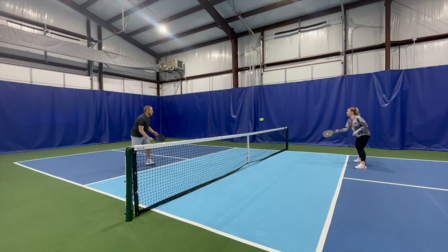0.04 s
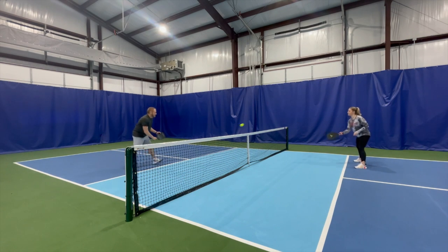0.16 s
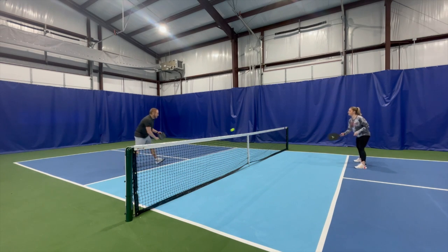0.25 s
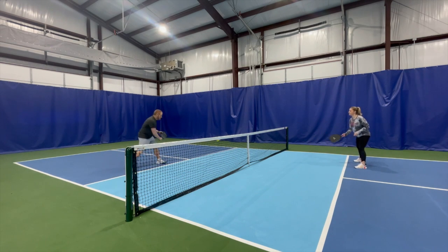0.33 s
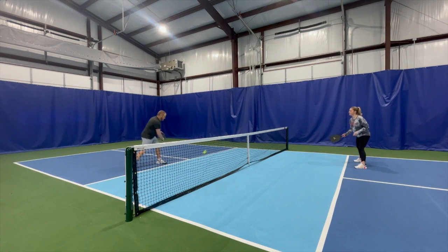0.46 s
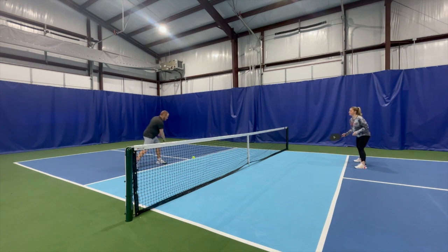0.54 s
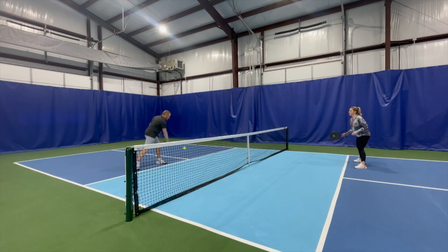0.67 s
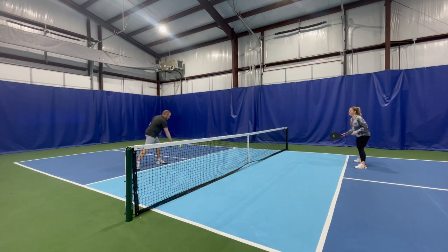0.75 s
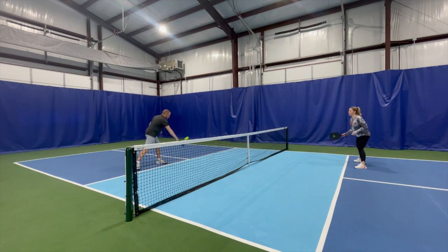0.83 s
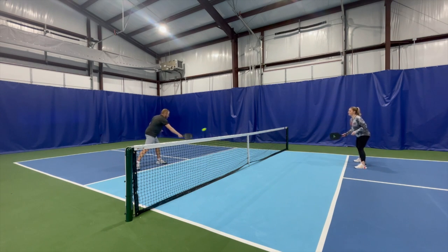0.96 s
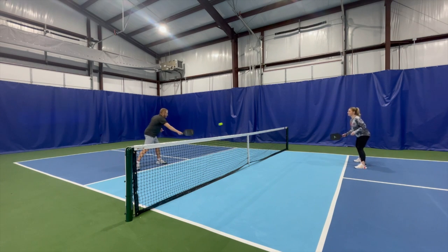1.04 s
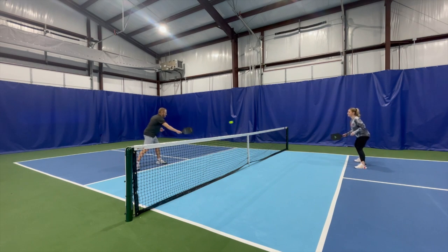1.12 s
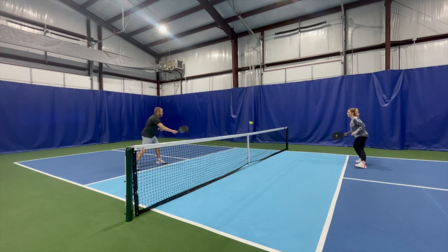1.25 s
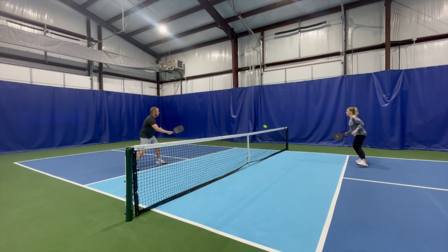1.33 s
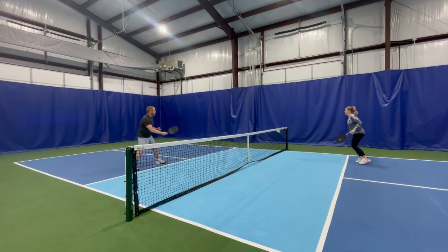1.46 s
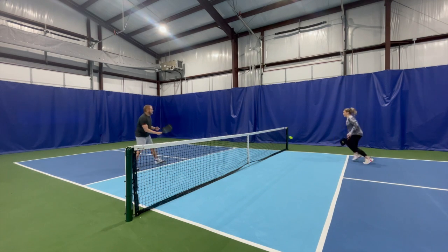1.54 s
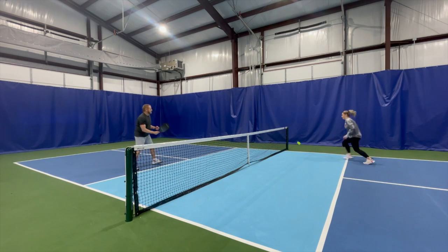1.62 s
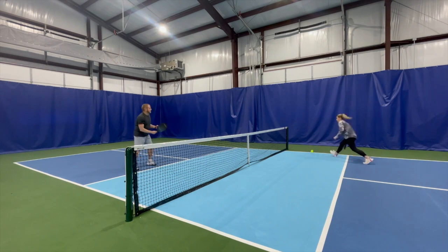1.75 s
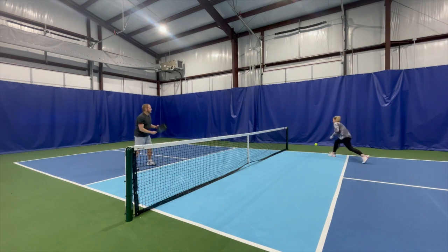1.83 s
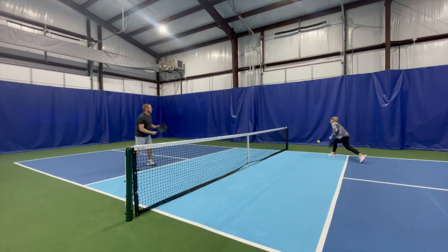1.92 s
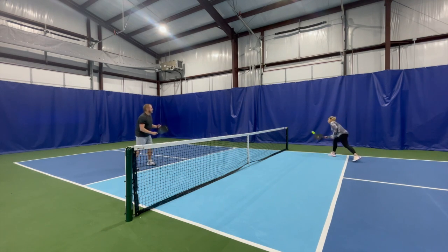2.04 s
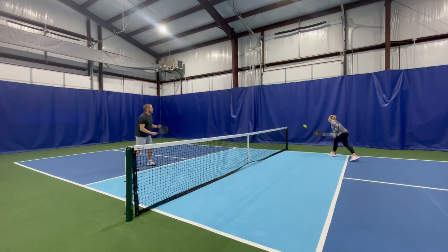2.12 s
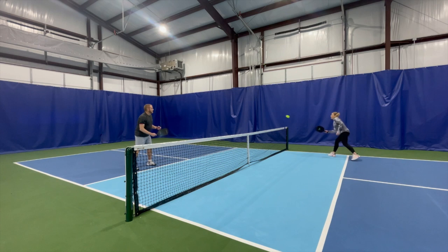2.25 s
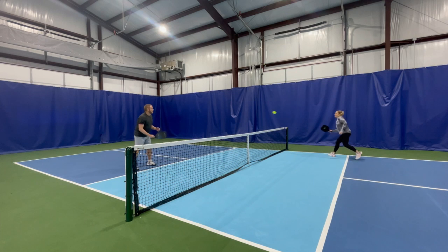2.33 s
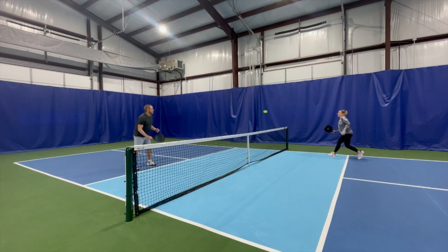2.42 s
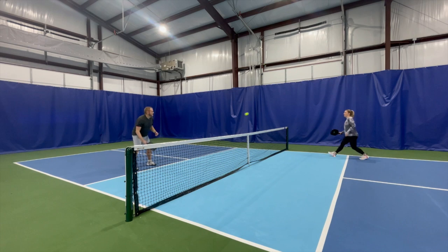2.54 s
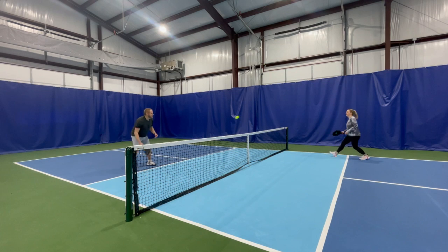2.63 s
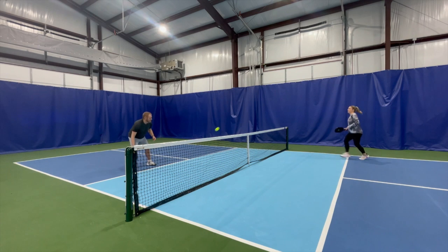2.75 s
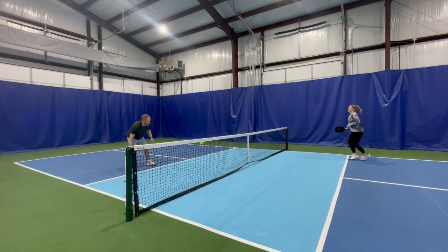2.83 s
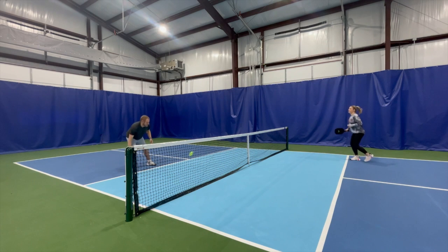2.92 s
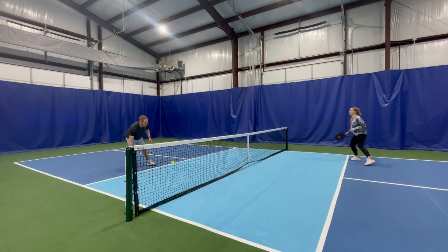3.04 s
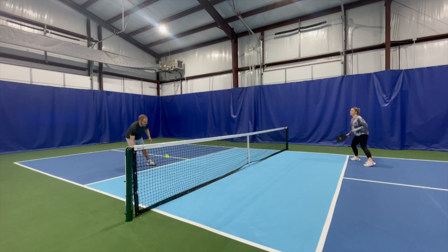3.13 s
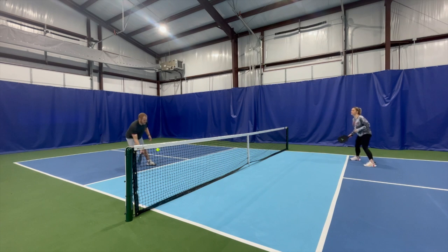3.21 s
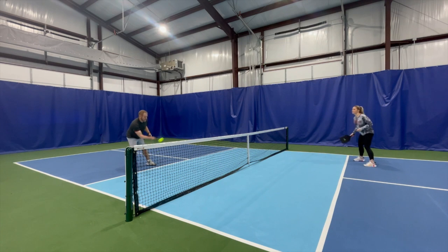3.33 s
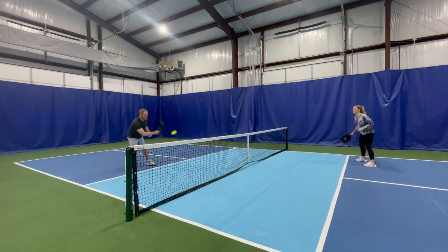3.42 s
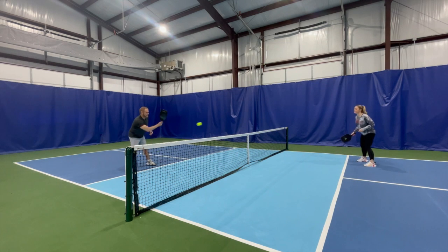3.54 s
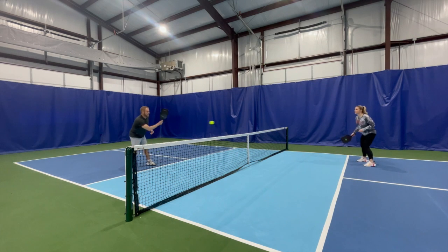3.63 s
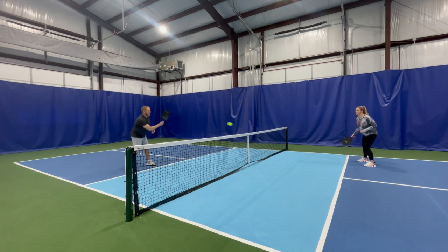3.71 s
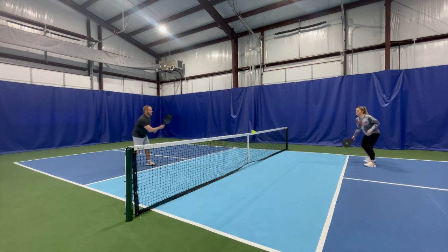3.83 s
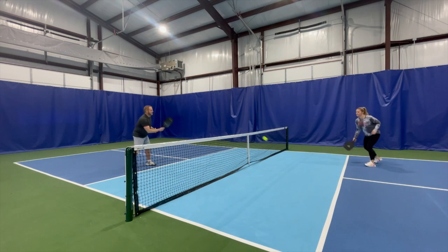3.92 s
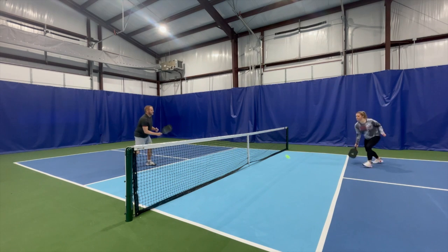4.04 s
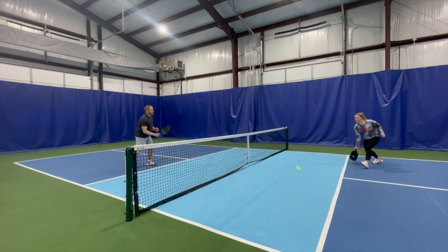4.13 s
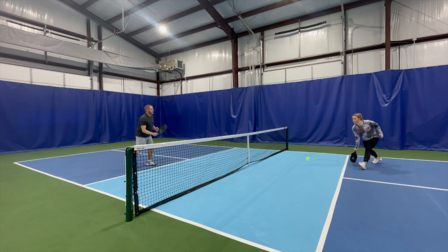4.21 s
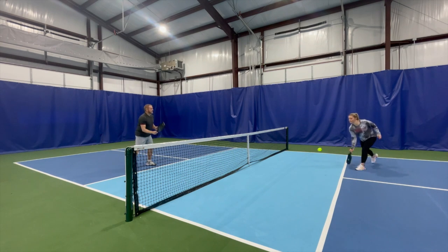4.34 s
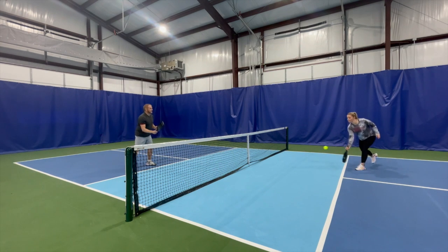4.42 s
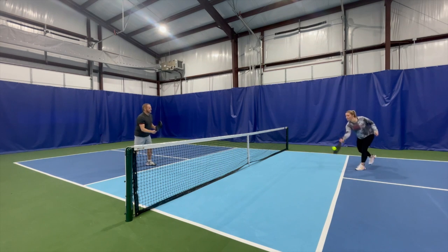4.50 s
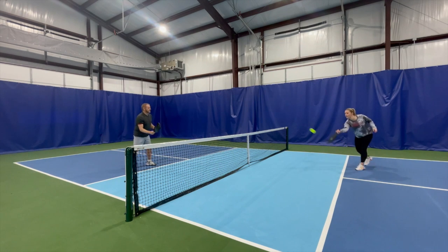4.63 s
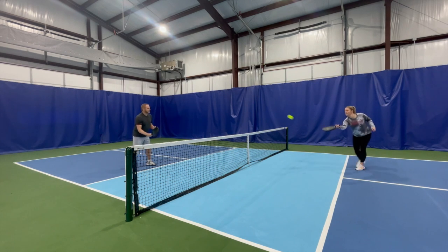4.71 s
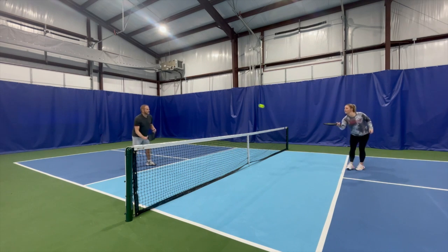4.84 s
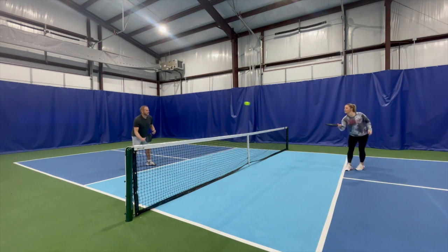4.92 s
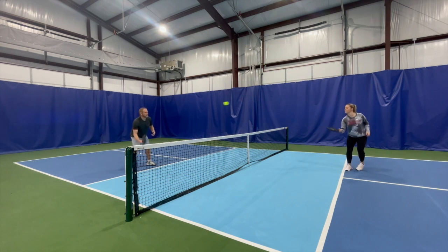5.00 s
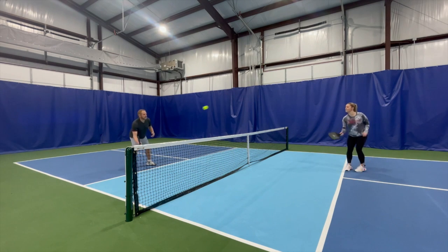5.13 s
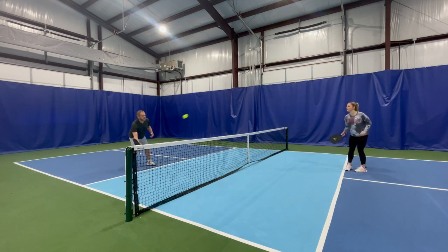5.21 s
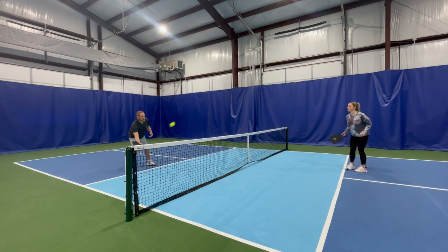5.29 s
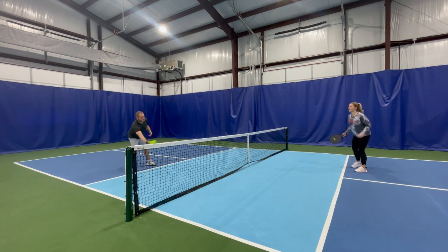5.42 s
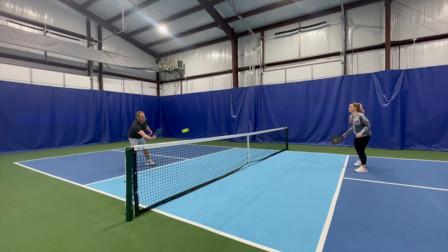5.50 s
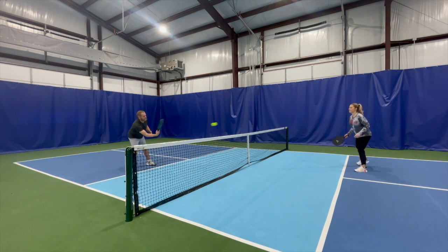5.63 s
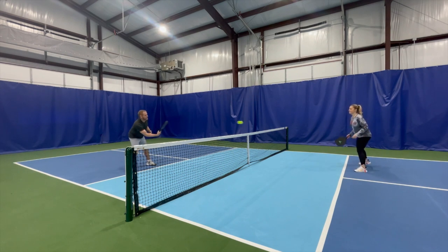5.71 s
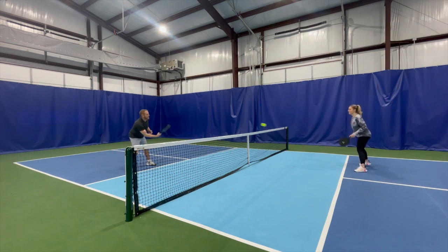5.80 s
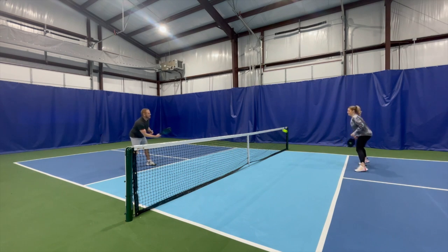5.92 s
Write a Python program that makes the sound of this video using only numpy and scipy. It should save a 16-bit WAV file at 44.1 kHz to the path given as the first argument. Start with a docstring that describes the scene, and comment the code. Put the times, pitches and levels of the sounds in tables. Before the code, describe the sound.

Two players tap a hollow plastic ball back and forth with hard paddles in a large echoing indoor court, shoes thudding and scuffing between hits.

```python
"""Paddle blows on a hollow plastic ball: two players dink over a net in a steel-roofed sports hall, a phone
at the net post. Blows and floor bounces are decaying rings under a burst of contact noise; shoes thud, slap
and scuff. Each sound comes straight to the phone and through the hall: roof and wall echoes, then noise
that dies over about a second. A faint, mostly bass rumble of hall air lies under it all."""
import sys
import numpy as np
from scipy import signal
from scipy.fft import rfft, irfft
from scipy.io import wavfile
from scipy.ndimage import uniform_filter1d

SR = 44100
rng = np.random.default_rng(int(sys.argv[2]) if len(sys.argv) > 2 else 0)


def pcm_store(signal):
    """Save signal as 16-bit PCM."""
    levels = np.round(np.clip(np.atleast_2d(signal), -1, 1) * 32767)
    wavfile.write(sys.argv[1], SR, levels.astype(np.int16).T)


N = 262836

LEFT, RIGHT = -0.59, 0.69  # where the two players stand, -1 left .. 1 right
PORT_LAG_S = 13 / 44100  # how late the treble reaches the right port
STEP_ECHO_MS, STEP_ECHO_DB = 15, 18  # wall echo of every footfall
SCUFF_HALL_DB = -17.5  # in the hall, relative to the straight level
# Ball meeting the floor: (time [s], level in the hall [dB], shell rings over the crack [dB],
#  gain straight to the phone of middle ring [dB], upper ring [dB] and crack [dB],
#  wall echo delay [ms], wall echo level [dB], side [-1 left .. 1 right])
BOUNCES = [(0.519, -42.5, -2, 13, 14.5, 22.5, 30, 2, -0.62), (1.7316, -43, -5.5, -3, -5, 26, 16, 15, -0.19),
           (2.9996, -39.5, -6.5, 12, 21.5, 27, 34.5, 25, -0.18),
           (4.128, -46.5, 0.5, 22, 15, 27, 28.5, 16.5, 0.46)]
# Colour of hard contact noise: (frequency [Hz], level [dB])
CONTACT_COLOUR = [(300, -71.5), (1500, -32), (2500, -2), (4000, -5.5), (6000, -2.5), (7500, -4.5),
                  (9000, -2), (11000, 2), (12300, -5.5), (13500, -55.5), (15000, -25.5), (16300, -46)]


def undb(db):
    """Amplitude ratio from decibels."""
    return 10 ** (np.asarray(db) / 20)


def along(table, hz, axis=1):
    """Read a column of a spectrum table on a log-frequency axis."""
    table = np.array(table)
    return np.interp(np.log(hz + 1), np.log(table[:, 0]), table[:, axis])


def fade(t, t60):
    """Exponential decay that loses 60 dB in t60 seconds."""
    return np.exp(-np.log(1000) * t / t60)


def ring(modes, contact_ms, size=4096):
    """Decaying modes that build up while the contact lasts and radiate little outside their range; peak 1."""
    t = np.arange(size) / SR
    y = sum(undb(db) * np.sin(2 * np.pi * hz * t) * fade(t, ms / 1000) for hz, ms, db in modes)
    y = y * (1 - np.exp(-t / contact_ms * 1000)) ** 2
    band = [0.5 * modes[0][0], 1.39 * modes[-1][0]]
    y = signal.sosfilt(signal.butter(2, band, "band", fs=SR, output="sos"), y)
    return y / abs(y).max()


def burst(shape, size=4096):
    """Noise under a short envelope with the colour of hard contact; peak 1."""
    noise = rng.standard_normal(size) * shape(np.arange(size) / SR)
    colour = undb(along(CONTACT_COLOUR, np.fft.rfftfreq(size, 1 / SR)))
    y = irfft(rfft(noise) * colour)
    y[size // 2:] = 0  # silence the second half of the buffer
    return y / abs(y).max()


def pair(one, other):
    """Spectra for left and right from two unrelated ones, partly alike and partly late and inverted."""
    # Both ports in a diffuse field: (frequency [Hz], share alike [below 0 upside down],
    #  share late and upside down on the right [ratio], left minus right [dB])
    port_likeness = [(65, 1, 0.051, -1), (154, 0.74, 0, -1), (333, 0.57, 0.066, -1), (530, -0.49, 0, -3.5),
                     (870, -0.43, 0.035, -1.5), (1490, -0.016, 0.064, -3.5), (3040, -0.13, 0.23, -2.5),
                     (4350, 0.12, 0.0025, -5.5), (7170, 0.13, 0, -7.5), (8500, 0.16, 0.75, 0.5),
                     (13100, -0.33, 1, 0)]
    hz = np.linspace(0, SR / 2, len(one))
    alike, late = (np.clip(along(port_likeness, hz, axis=k), -.99, .99) for k in (1, 2))
    tie = alike - late * np.exp(-2j * np.pi * hz * PORT_LAG_S)
    right = tie * one + np.sqrt(np.clip(1 - abs(tie) ** 2, 0, 1)) * other
    tilt = undb(along(port_likeness, hz, axis=3) / 2)
    return np.array([one * tilt, right / tilt])


def ports(hz, side):
    """One wave at the two ports: the nearer hears it sooner and louder; the treble has a fixed lag and sign."""
    side_lag_ms, side_db, split_hz = 0.56, 11.5, 6000  # lag and level between ports, per unit of side
    louder = undb(side_db * side / 2 * hz / (hz + 250))
    sooner = np.exp(1j * np.pi * hz * side * side_lag_ms / 1000)
    lean = louder * sooner
    low = 1 / (1 + (hz / split_hz) ** 6)
    treble = np.array([np.ones(len(hz)), -np.exp(-2j * np.pi * hz * PORT_LAG_S)])
    return low * np.array([1 / lean, lean]) + (1 - low) * treble


def hall(echo_ms, echo_db, side, size):
    """Spectrum of the hall's answer: noise that thickens until the wall answers, then dies band by band."""
    # Reverberation of the hall: (frequency [Hz], decay by 60 dB [s])
    band_decay = [(60, 0.78), (125, 1.01), (250, 0.88), (500, 0.77), (1000, 0.68), (2000, 0.98),
                  (4000, 1.34), (7000, 1.206), (11000, 0.71)]
    early_db, patchy_db, top_hz = -14, 5, 12500
    roof_ms, roof_db = 12.3, 15  # early echo, alike for every spot on the court
    curtain_hz = 9000  # wall curtains dull the echoes above this
    t, hz = np.arange(size) / SR, np.fft.rfftfreq(size, 1 / SR)
    white = pair(*rfft(rng.standard_normal((2, size)))) / np.sqrt(1 + (hz / top_hz) ** 60)

    # overlapping triangular bands, each with its own decay
    centres = np.log(np.array(band_decay)[:, 0])
    place = np.interp(np.log(hz + 1), centres, np.arange(len(band_decay)))
    tail = 0
    for k, (_, t60) in enumerate(band_decay):
        tail = tail + irfft(white * np.clip(1 - abs(place - k), 0, 1)) * fade(t, t60)
    before_wall = np.clip(1 - t / echo_ms * 1000, 0, 1)
    tail = tail * np.clip(t / 0.002, 0, 1) * undb(early_db * before_wall)

    # the first tenth of a second still comes in separate clumps
    clumps = uniform_filter1d(np.repeat(rng.standard_normal(size // 128), 128), size=96)
    tail = tail * undb(patchy_db * clumps * np.exp(-t / 0.086))

    # two mirror echoes: the roof and the wall behind the player
    hz = np.fft.rfftfreq(2 * size, 1 / SR)
    mirrors = ((roof_ms, roof_db), (echo_ms, echo_db))
    echoes = sum(undb(db) * np.exp(-2j * np.pi * hz * ms / 1000) for ms, db in mirrors)
    return rfft(tail, 2 * size) + echoes * ports(hz, side) / np.sqrt(1 + (hz / curtain_hz) ** 2)


def add(out, s, parts, near_db, far_db, side, response):
    """Place one event: its parts straight to the two ports, and in another blend through the hall."""
    straight_bright_hz = 5900  # contact noise beams its treble; below this it reaches the phone weaker
    size = 2 * (response.shape[1] - 1)
    spectra = rfft(parts, size)
    hz = np.fft.rfftfreq(size, 1 / SR)
    contact_size = np.linalg.norm(spectra[-1])
    spectra[-1] *= hz / np.hypot(hz, straight_bright_hz)
    near = undb(near_db) @ spectra * ports(hz, side)

    # in the hall the contact is a short click with the smooth contact colour
    even = undb(along(CONTACT_COLOUR, hz)) * np.exp(-2j * np.pi * hz * .0015)
    spectra[-1] = even * contact_size / np.linalg.norm(even)
    far = undb(far_db) / np.sqrt(np.sum(parts ** 2, axis=1)) @ spectra

    sound = irfft(near + far * response)[:, :size - 4096]
    at = int(round(s * SR))
    lo, hi = max(at, 0), min(at + sound.shape[1], N)
    out[:, lo:hi] += sound[:, lo - at:hi - at]
    return out


def rumble():
    """The steady air of the hall: shaped noise, mostly bass, its level wavering a little."""
    # Tone of the hall air: (frequency [Hz], relative level per Hz [dB])
    air_colour = [(25, 2), (65, -3), (150, -17.5), (300, -27), (700, -20), (2000, -18), (6000, -27.5),
                  (10000, -36.5), (13000, -76)]
    level_db, sway_db = -61, 1
    hz = np.fft.rfftfreq(N, 1 / SR)
    noise = pair(*rfft(rng.standard_normal((2, N))))
    air = irfft(noise * undb(along(air_colour, hz)), N)
    k = int(SR / 6)
    sway = uniform_filter1d(np.repeat(rng.standard_normal(N // k + 1), k), k)[:N]
    return air / air.std() * undb(level_db + sway_db * sway)


def scuff(slide_ms):
    """A sole dragged over the court: noise that grips, slides, lets go."""
    def drag(t):
        return (1 - np.exp(-t / 0.0046)) * fade(np.clip(t - slide_ms / 1000, 0, 1), 0.026)
    return burst(drag)


def scuffs():
    """Soles that slide as a player sets off or stops: scuff noise straight and through the hall."""
    # Slides of the soles: (time [s], straight level [dB], length of the slide [ms], player [side])
    slides = [(1.303, -42.5, 5.1, RIGHT), (1.399, -53, 4.7, RIGHT), (1.814, -39, 3, RIGHT),
              (2.81, -51.5, 6, LEFT), (2.854, -74, 4, LEFT), (3.913, -37.5, 5.1, RIGHT),
              (4.075, -35, 22, RIGHT), (4.291, -61, 5, RIGHT), (4.89, -60, 5, RIGHT),
              (5.116, -45, 12, LEFT)]
    out = np.zeros((2, N))
    for s, db, slide_ms, side in slides:
        response = hall(STEP_ECHO_MS, STEP_ECHO_DB, side, size=32768)
        add(out, s, scuff(slide_ms)[None], [db], [db + SCUFF_HALL_DB], side, response)
    return out


def shoes():
    """A heel thuds into the floor and the sole slaps, two short rings with a faint gritty edge."""
    # Footfalls: (time [s], straight thud level [dB], straight slap level [dB],
    #  lower slap mode [Hz], player [side])
    footfalls = [(0.152, -53.5, -78, 550, RIGHT), (0.251, -46.5, -64, 1140, RIGHT),
                 (0.362, -55.5, -58, 527, RIGHT), (1.208, -31, -29, 640, RIGHT),
                 (1.399, -58.5, -47.5, 620, RIGHT), (1.525, -57.5, -42, 580, LEFT),
                 (1.544, -48, -47, 553, LEFT), (1.814, -37, -30, 830, RIGHT),
                 (1.83, -45, -34.5, 1480, RIGHT), (2.439, -50.5, -45, 564, RIGHT),
                 (2.619, -47.5, -46.5, 540, RIGHT), (2.852, -43, -39.5, 760, LEFT),
                 (3.697, -44.5, -38.5, 490, RIGHT), (3.91, -49, -40.5, 500, RIGHT),
                 (3.943, -47.5, -42.5, 480, RIGHT), (4.291, -49, -43.5, 516, RIGHT),
                 (4.89, -56.5, -42.5, 553, RIGHT), (4.921, -52, -57, 536, RIGHT),
                 (5.116, -65.5, -56, 574, LEFT)]
    thud_hall_db, slap_hall_db = -7.5, -16  # relative to the straight level
    out = np.zeros((2, N))
    thud = ring([(60, 112, 7.0), (166.8, 14.9, 18.4)], 0.28)
    for s, thud_db, slap_db, slap_hz, side in footfalls:
        slap = ring([(slap_hz, 8, 0), (1.62 * slap_hz, 6, -3)], 0.11)
        parts = np.array([thud, slap, scuff(0)])
        near = np.array([thud_db, slap_db, slap_db - 19.5])
        far = near + [thud_hall_db, slap_hall_db, SCUFF_HALL_DB]
        add(out, s, parts, near, far, side, hall(STEP_ECHO_MS, STEP_ECHO_DB, side, size=32768))
    return out


def slab():
    """Each bounce also runs through the floor slab and arrives a little ahead, dull and faint."""
    lead_s, level_db = 0.008, -41
    out, knock = np.zeros(N), ring([(306, 13, 6), (510, 10.0, 5.5)], 0.71)
    for s, *_ in BOUNCES:
        at = int((s - lead_s) * SR)
        out[at:at + len(knock)] += knock * undb(level_db)
    return out


def blow(s, rings, near_db, far_db, echo_ms, echo_db, side, rattle_db, rattle_t60):
    """Ball against paddle or floor: the body rings, the contact cracks and the shell rattles on briefly."""
    def contact(t):
        crack = t / .0003 * np.exp(1 - t / .0003)
        rattle = undb(rattle_db) * np.clip(t / 0.0026, 0, 1) * fade(t, rattle_t60)
        return crack + rattle
    parts = np.array(rings + [burst(contact)])
    response = hall(echo_ms, echo_db, side, size=65536)
    return add(np.zeros((2, N)), s, parts, near_db, far_db, side, response)


def bounces():
    """The ball on the floor: one blend of shell rings, stronger or weaker against the crack."""
    # Modes of the shell, grouped as thump, low, middle and upper ring:
    #  (frequency [Hz], decay by 60 dB [ms], level within the ring [dB])
    shell_modes = [
        [(111, 7.7, 0.017), (204, 15, 0)],
        [(423, 4.3, 0)],
        [(1038, 5.5, -4), (1372, 4.2, -6)],
        [(2400, 4.06, 9), (2850, 6.1, -18.5)],
    ]
    hall_blend_db = np.array((-1.1, 0.35, -0.2, -0.088))  # thump, low, middle, upper ring
    under_middle_db = np.array((-28, -16))  # straight gain of thump and low ring, relative to the middle
    out, rings = 0, [ring(modes, 0.16) for modes in shell_modes]
    for s, db, ring_db, middle_db, upper_db, crack_db, echo_ms, echo_db, side in BOUNCES:
        far = db + np.append(ring_db + hall_blend_db, 0)
        near = far + [*(middle_db + under_middle_db), middle_db, upper_db, crack_db]
        out = out + blow(s, rings, near, far, echo_ms, echo_db, side, rattle_db=-7.5, rattle_t60=0.022)
    return out


def paddles():
    """An off-centre blow trades middle ring for low; a face turned to the phone sends more straight to it."""
    # Blows: (time [s], level in the hall [dB], off centre: low ring up and middle ring down [dB],
    #  upper ring [dB], face to the phone: low ring gain [dB] and crack gain [dB] over the hall level,
    #  wall echo delay [ms], wall echo level [dB], side [-1 left .. 1 right],
    #  pitch of the rings [ratio], length of the rings [ratio])
    hits = [(-0.33, -37.5, 2, -8.5, 0, 0, 33, 22, -.8, 0.94, 0.8),
            (0.8049, -31.5, -0.5, -10, 1.5, 16.5, 31.15, 23.5, -0.33, 1.053, 1.12),
            (1.9995, -31, -1.5, -3.5, 14.5, 24.5, 25.7, 24, 0.72, 1.017, 0.72),
            (3.3007, -34.5, 5.5, -8.5, 3, 21, 35.46, 24.2, -0.63, 1.075, 0.59),
            (4.5231, -30, -2, -12, 4, 24, 30.15, 22.5, 0.48, 1.02, 1.12),
            (5.4104, -29, 2.5, -5.5, -1, 16, 37.7, 22, -0.64, 0.99, 0.71)]
    # Modes of the paddle at ratio 1, grouped as thump, low, middle and upper ring:
    #  (frequency [Hz], decay by 60 dB [ms], level within the ring [dB])
    paddle_modes = [
        [(128, 83, -24.5), (176.3, 25.6, 1)],
        [(347, 41, -10.5), (448, 15.7, 9.5), (533, 14.5, 1.5), (750, 30, -17)],
        [(1115, 9, -7), (1210, 18.2, 2.5), (1545, 56, -17)],
        [(1957, 12.7, 22), (2260, 8.7, 18.5), (2670, 2.2, -8), (3044, 14, -15)],
    ]
    thump_hall_db, low_hall_db, middle_hall_db = -9, 2.5, 1.5  # over the crack, for a centred blow
    thump_db, middle_db, top_db = 0, 7, 8  # straight gain: thump over the low ring's; middle and upper ring
    out = 0
    for s, db, off_db, upper_db, low_db, crack_db, echo_ms, echo_db, side, pitch, length in hits:
        rings = []
        for modes in paddle_modes:
            tuned = [(hz * pitch, ms * length, g) for hz, ms, g in modes]
            rings.append(ring(tuned, 0.67))
        far = db + np.array([thump_hall_db, low_hall_db + off_db, middle_hall_db - off_db, upper_db, 0])
        near = far + [low_db + thump_db, low_db, middle_db, top_db, crack_db]
        out = out + blow(s, rings, near, far, echo_ms, echo_db, side, rattle_db=-1.5, rattle_t60=0.019)
    return out


def scene():
    """The hall air, the players' feet, and the ball on floor and paddle."""
    return rumble() + scuffs() + shoes() + slab() + bounces() + paddles()


def record(dry):
    """The phone thins and delays the bass, turns quiet sound above it further down and cuts the top."""
    low_cut_hz, top_hz, bass_hz = 68.2, 16200, 250
    quiet_db, slope = -60, 1.0  # below this level, extra dB lost per dB
    late_cycles = 0.61
    x = signal.sosfilt(signal.butter(2, low_cut_hz, "high", fs=SR, output="sos"), dry)
    # its filters hold each low tone back by part of a cycle
    hz = np.clip(np.fft.rfftfreq(N, 1 / SR), 40, 5000)
    x = irfft(rfft(x) * np.exp(-2j * np.pi * late_cycles * np.log(hz)), N)
    bass = signal.sosfiltfilt(signal.butter(2, bass_hz, fs=SR, output="sos"), x)
    upper = x - bass
    power = signal.lfilter([.002], [1, -.998], np.mean(upper ** 2, axis=0)) + 1e-12
    power = np.append(power[100:], power[-100:])  # the gain looks 100 samples ahead
    x = bass + upper * np.clip(power / undb(2 * quiet_db), 0, 1) ** (slope / 2)
    return signal.sosfilt(signal.ellip(8, .2, 80, top_hz, fs=SR, output="sos"), x)


dry = scene()
out = record(dry)
pcm_store(out)
```